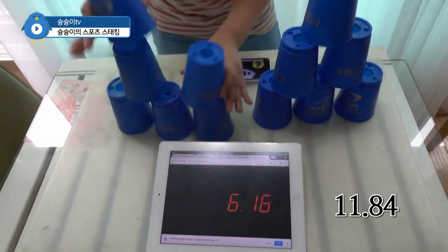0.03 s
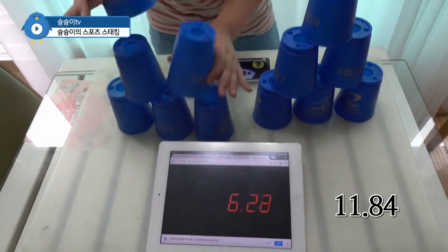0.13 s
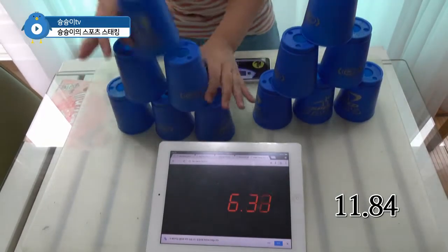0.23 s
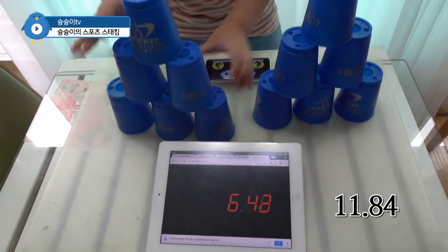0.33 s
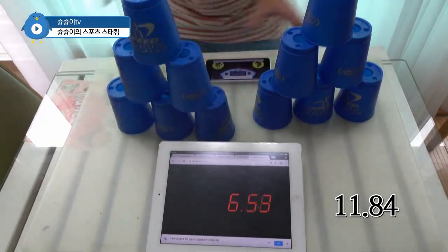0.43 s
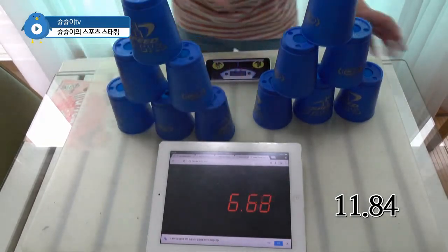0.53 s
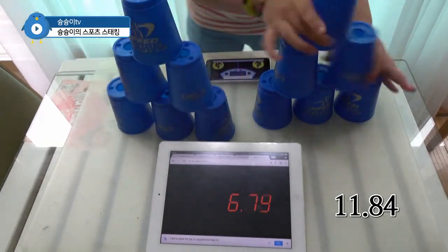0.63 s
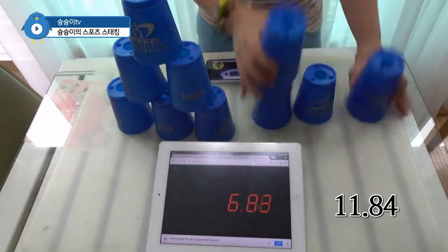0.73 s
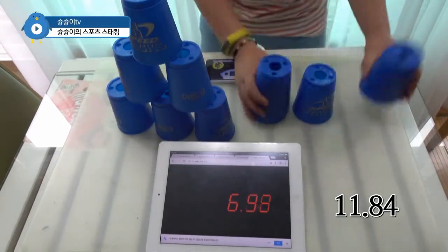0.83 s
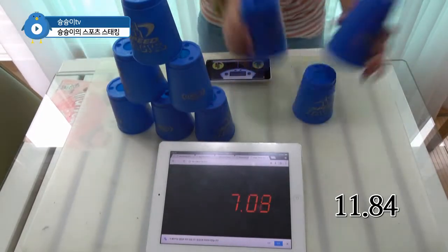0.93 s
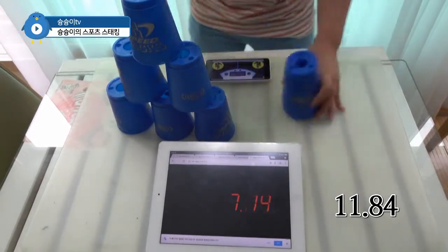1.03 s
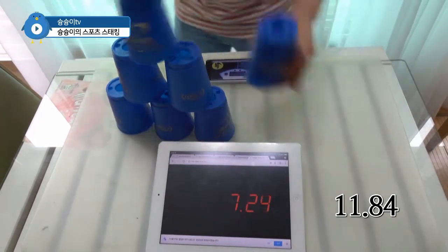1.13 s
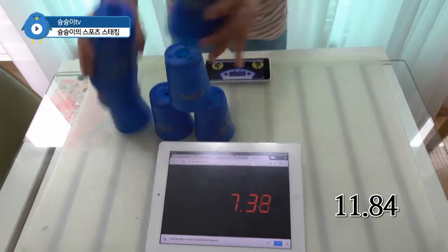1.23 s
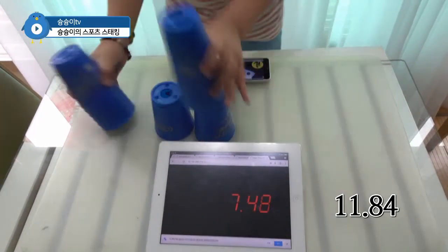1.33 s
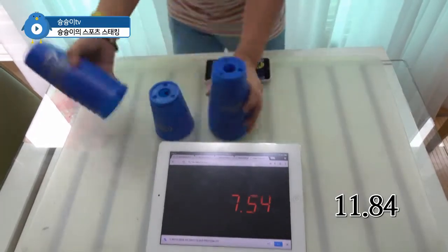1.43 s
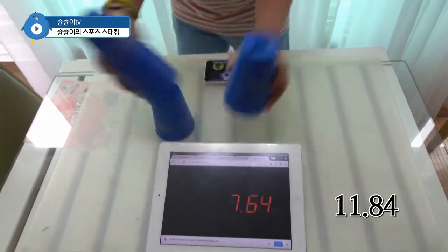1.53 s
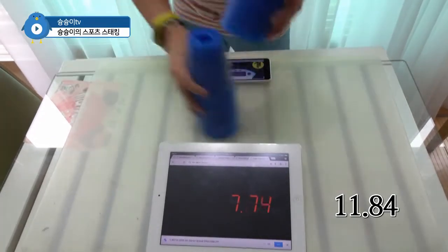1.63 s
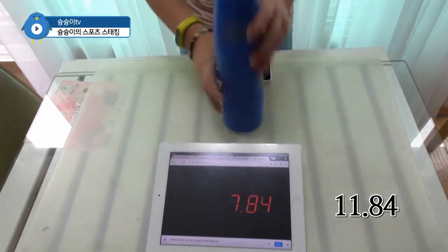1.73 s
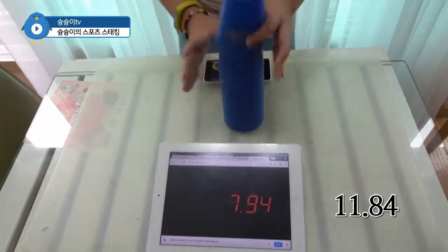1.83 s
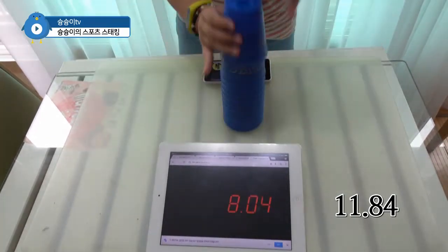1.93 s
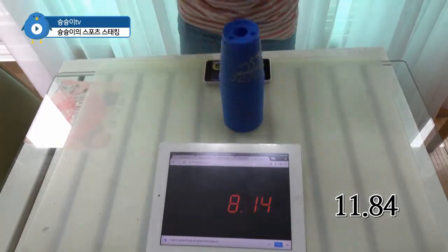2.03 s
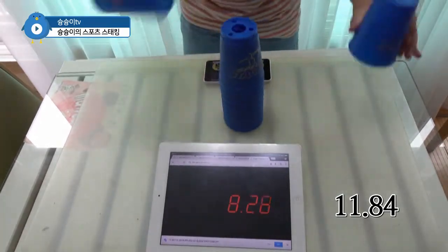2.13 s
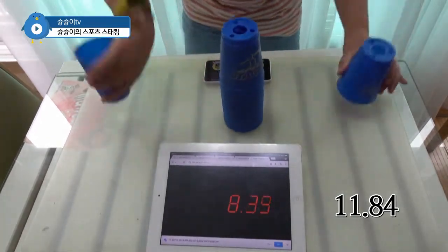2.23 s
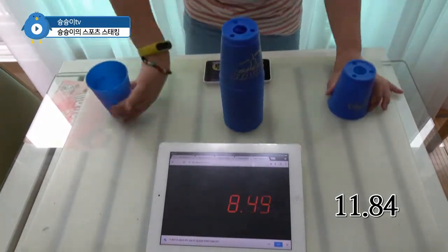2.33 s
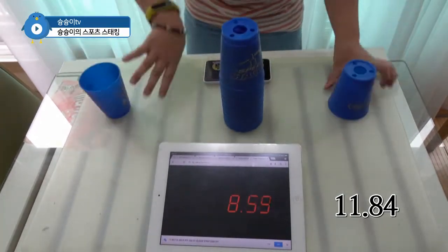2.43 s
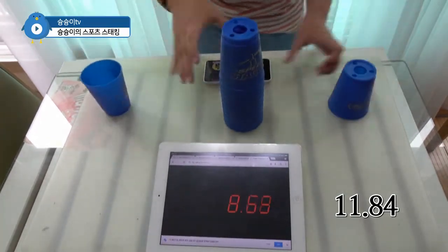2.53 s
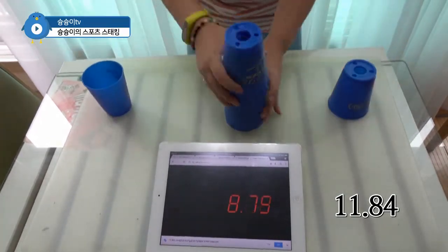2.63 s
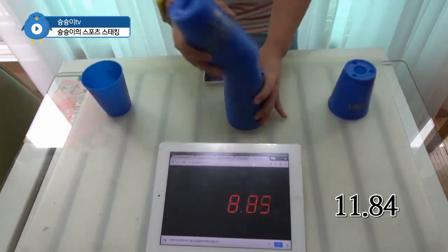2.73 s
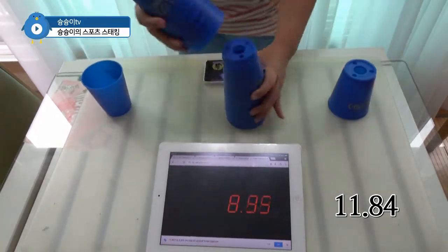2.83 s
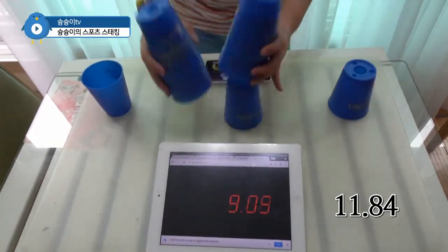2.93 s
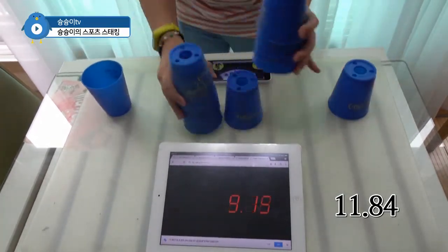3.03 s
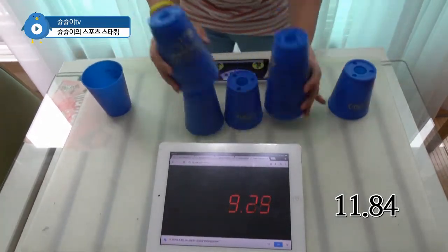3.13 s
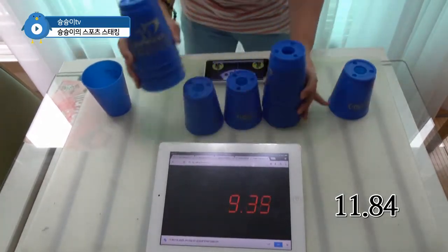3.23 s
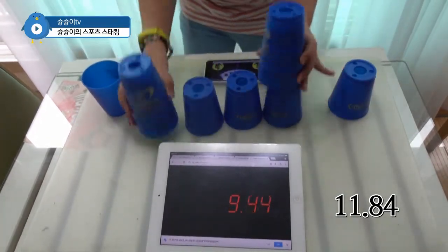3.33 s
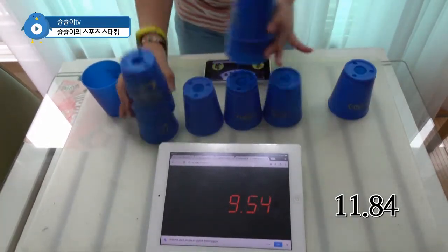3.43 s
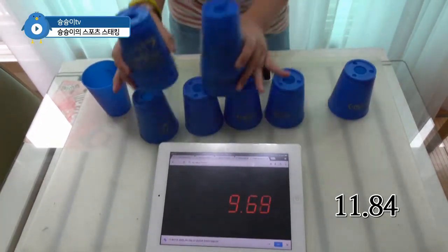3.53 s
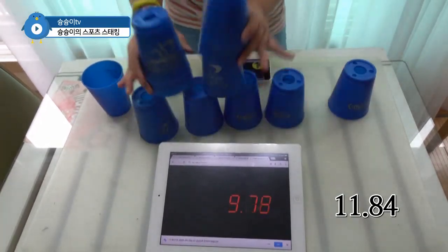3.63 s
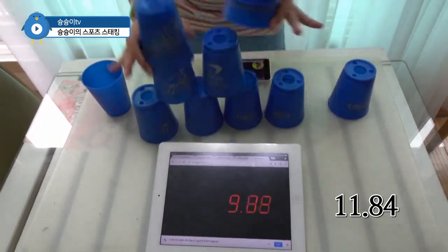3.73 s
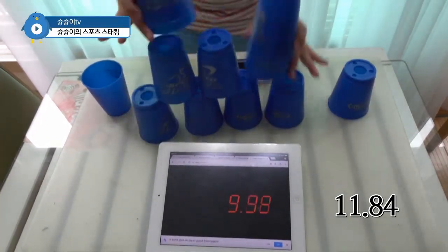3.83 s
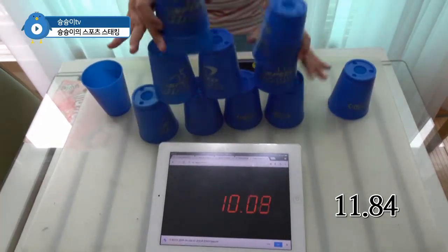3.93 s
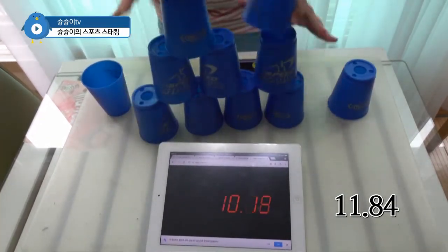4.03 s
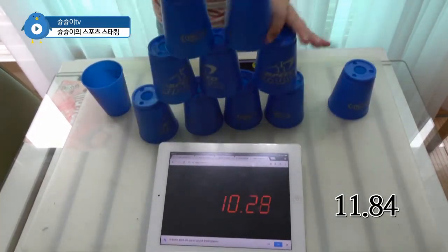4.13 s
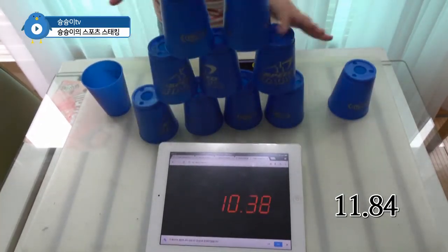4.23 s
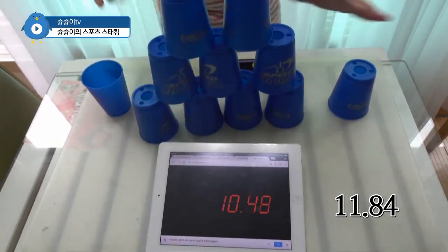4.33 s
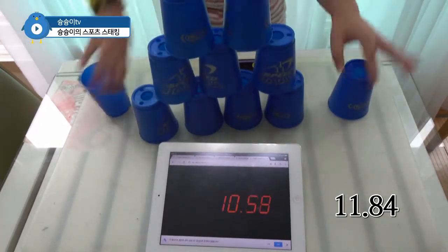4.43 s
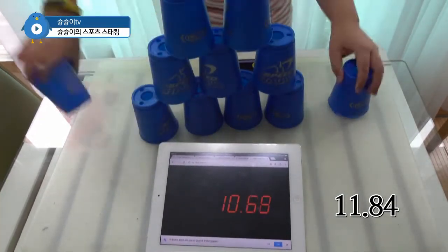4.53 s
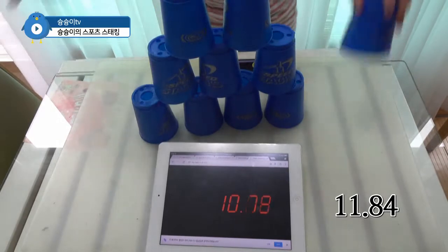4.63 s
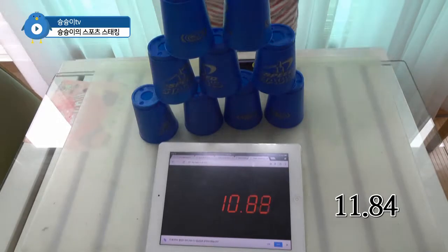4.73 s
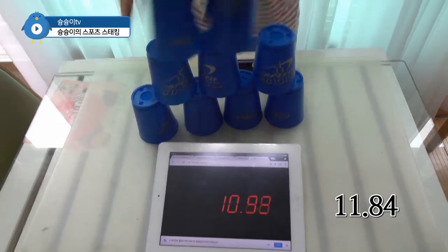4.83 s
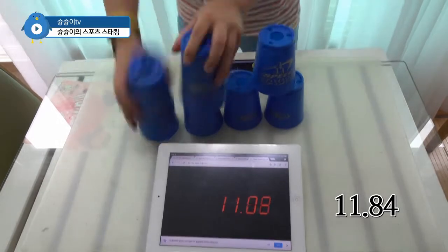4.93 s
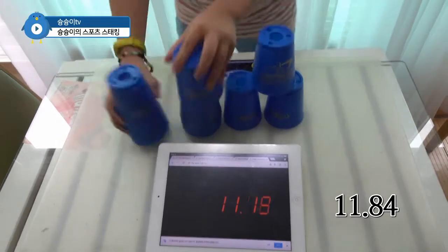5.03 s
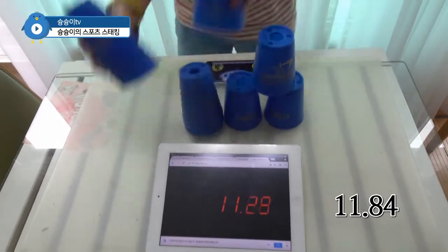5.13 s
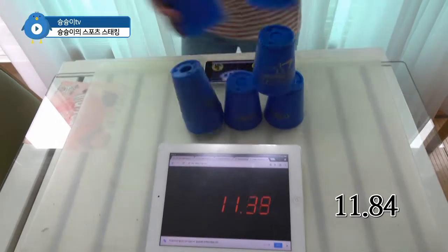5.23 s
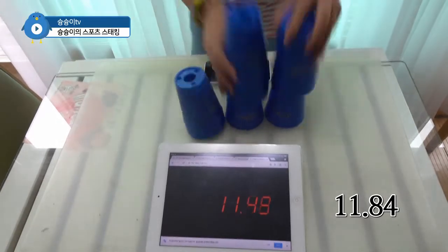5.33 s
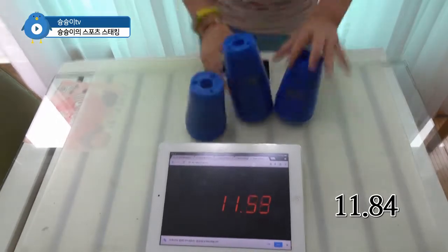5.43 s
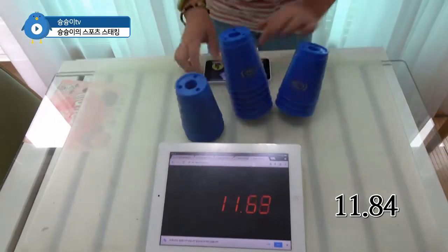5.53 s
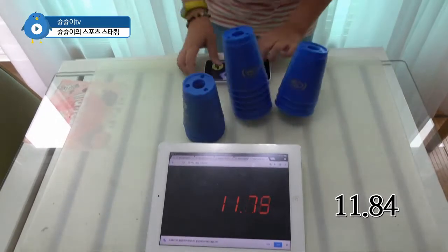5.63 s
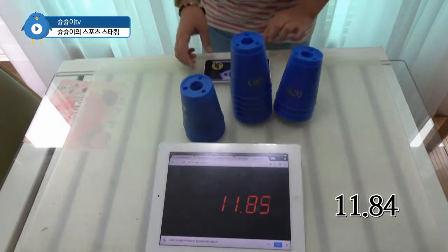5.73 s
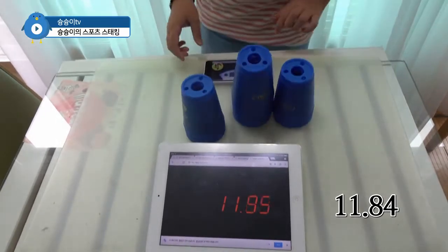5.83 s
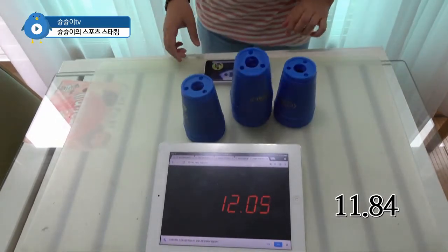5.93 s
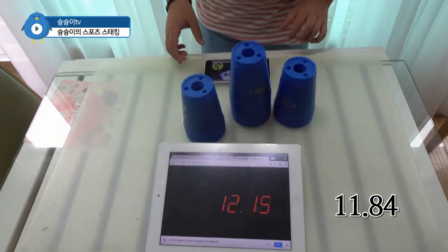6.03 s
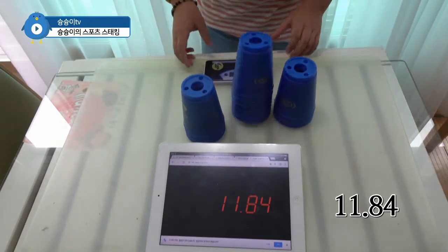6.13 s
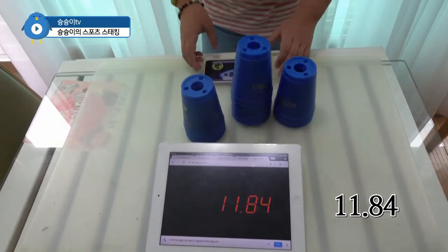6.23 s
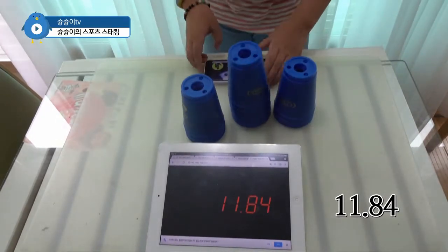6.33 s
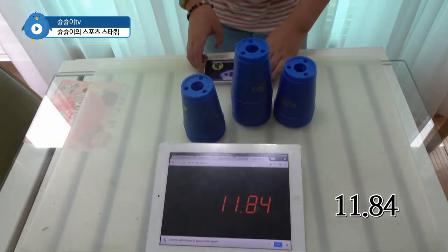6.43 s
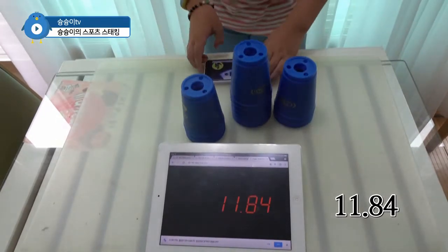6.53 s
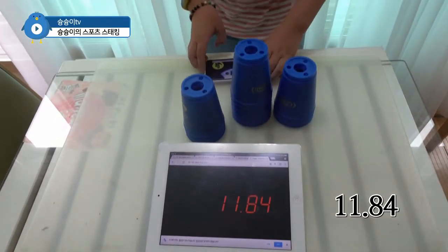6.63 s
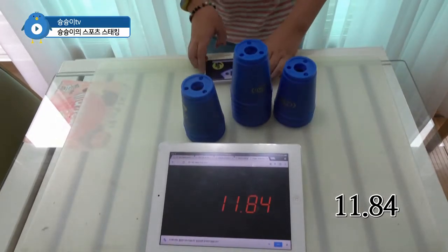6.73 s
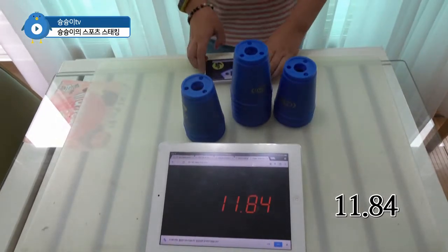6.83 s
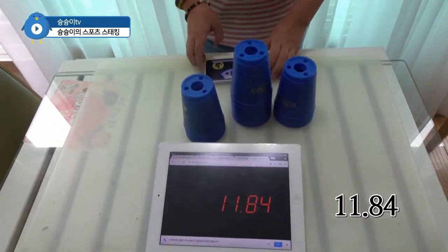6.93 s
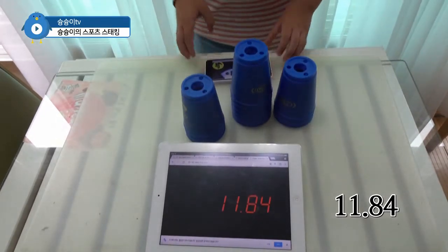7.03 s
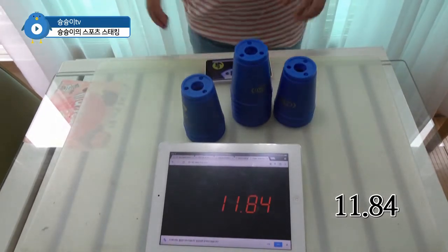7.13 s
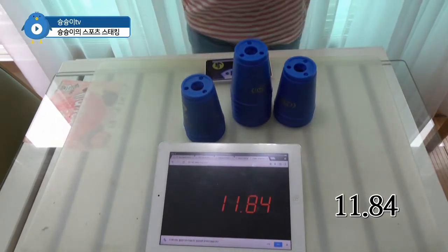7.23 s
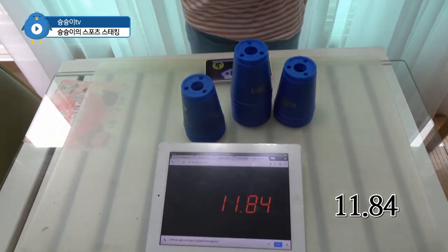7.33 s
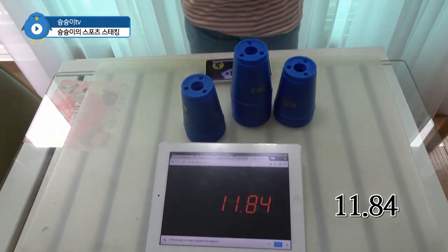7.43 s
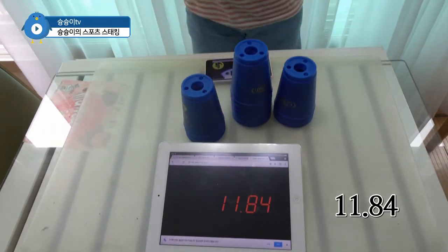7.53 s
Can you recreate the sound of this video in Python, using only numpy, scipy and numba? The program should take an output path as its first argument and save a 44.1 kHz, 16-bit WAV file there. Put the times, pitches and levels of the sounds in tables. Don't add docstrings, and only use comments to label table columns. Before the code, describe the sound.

Close stereo microphones in a small, lively room catch hollow plastic cups being stacked very fast on a table. A loud rattling collapse with sharp rim clashes comes first, then a quieter moment of sleeve rustle and finger taps, a quick run of separate cup knocks, a second hard collapse, and finally soft hand thumps fading into low house murmur.

```python
import sys
import numpy as np
from scipy import signal
from scipy.fft import rfft, irfft
from scipy.io import wavfile
from scipy.ndimage import uniform_filter1d, minimum_filter1d
from numba import njit

SR = 44100
rng = np.random.default_rng(int(sys.argv[2]) if len(sys.argv) > 2 else 0)


def invert_db(level):
    return 10 ** (np.asarray(level, dtype=float) / 20)


def unload_wav(signal):
    wavfile.write(
        sys.argv[1],
        SR,
        np.round(np.clip(np.atleast_2d(signal).T, -1, 1) * 32767).astype(np.int16),
    )


N = 335146

# (frequency [Hz], level [dB], t60 [s])
TABLE_MODES = [(144.5, -2.5, 0.17), (260.4, 3.5, 0.075), (364.3, 3.5, 0.1), (565, -11, 0.063),
               (110, -12, 0.041)]
# (frequency [Hz], level [dB])
RIM_SPECTRUM = [(800, -3.5), (2500, 0), (3500, -0.5), (5200, 1.5), (7500, -2.5), (11000, -6.5),
                (15000, -14.5)]


def colour(x, points):
    hz, db = np.transpose(points)
    f = np.maximum(np.fft.rfftfreq(x.shape[-1], 1 / SR), 1)
    gain = invert_db(np.interp(np.log(f), np.log(hz), db))
    return irfft(rfft(x) * gain, x.shape[-1])


def unit(x):
    return x / np.sqrt(np.mean(x ** 2))


def walk(rate):
    hold = int(SR / rate)
    steps = np.repeat(rng.standard_normal(N // hold + 1), hold)
    return unit(uniform_filter1d(steps, hold)[:N])


def half_octave(f):
    return [(f / 1.5, -60), (f / 1.3, -6), (f, 0), (f * 1.3, -6), (f * 1.5, -60)]


def ring(modes, pitch, chance):
    contact_s = 0.0011
    t = np.arange(SR // 4)[:, None] / SR
    hz, db, t60 = np.transpose(modes)
    hz = hz * pitch * (1 + chance[0])
    size = invert_db(db + chance[1]) * (-1) ** np.arange(len(hz))
    decay = np.exp(-np.log(1000) * t / t60)
    y = (size * np.sin(2 * np.pi * hz * t) * decay).sum(axis=1)
    y = y * np.minimum(t[:, 0] / contact_s, 1)
    return y / np.abs(y).max()


def add(out, s, y, pan_db, send=None):
    send = y if send is None else send
    i = max(int(s * SR), 0)
    y, send = y[:N - i], send[:N - i]
    sides = invert_db(np.array([[pan_db], [-pan_db]]) / 2)
    out[:2, i:i + len(y)] += y * sides
    out[2, i:i + len(y)] += send


def harder(db):
    knee_db, hidden_db_per_db = -13.5, 1.257
    return db + hidden_db_per_db * np.maximum(db - knee_db, 0)


def knock(out, s, db, hz, table_db, shell_db, wall_db):
    # (ratio to cup pitch, level [dB], t60 [s])
    air_modes = [(1.002, 8.5, 0.022), (0.73, -10, 0.062), (1.235, -5, 0.038), (0.619, 0, 0.019)]
    # (frequency [Hz], level [dB], t60 [s])
    shell_modes = [(1194, 0, 0.053), (1061, 10, 0.013), (1275, -3.5, 0.044), (1400, 2.5, 0.025)]
    # (frequency [Hz], level [dB], t60 [s])
    wall_modes = [(1578, -10, 0.041), (1900, 11.5, 0.0048), (2248, 11.5, 0.0038), (3130, -4, 0.0034)]
    c = rng.standard_normal((4, 2, 5))
    air = ring(air_modes, hz, c[0, :, :4] * [[.03], [3.0]] * [0, 1, 1, 1])
    shell = ring(shell_modes, 0.93, c[1, :, :4] * [[.02], [3.0]])
    wall = ring(wall_modes, 0.92, c[2, :, :4] * [[.06], [3.0]])
    table = ring(TABLE_MODES, 1, c[3] * [[.008], [2.5]])
    cup = air + invert_db(shell_db + 2.0) * shell - invert_db(wall_db + 15.5) * wall
    add(out, s, invert_db(db) * cup / np.abs(cup).max(), 0.5 * c[0, 0, 4])
    add(out, s, invert_db(db + table_db + 8.0) * table, 0)


def tick(out, s, db, top_db, straight_db=0):
    fizz, fizz_decay_s, room_click = 0.16, 0.004, 1.7
    lead = 24
    t = np.arange(1024) / SR
    noise = rng.standard_normal(1025)
    click = signal.unit_impulse(1024)
    direct = click + fizz * noise[1:] * np.exp(-t / fizz_decay_s)
    contact = np.roll([direct, click * room_click], lead, axis=1)
    sharpness = np.outer([0.043, 0.035, 0.006, 0.17, 0.3, 0.56, 0.7], [0, top_db])
    crack = colour(contact, RIM_SPECTRUM + sharpness)
    crack = invert_db(db) * crack / np.abs(crack[1] / room_click).max()
    add(out, s - lead / SR, invert_db(straight_db) * crack[0], 1.7 * noise[0], crack[1])


def stacked_cups(out):
    # (time [s], peak [dB], cup pitch [Hz], shell share [dB], rim tick [dB])
    stacked = [(0.212, -7.5, 820, -6, -11.5), (0.278, -5.5, 546, 2.5, -38), (0.66, -10.5, 556, -7.5, -26),
               (0.707, -11, 503, -4, -38), (1.767, -13, 805, -1, -25), (2.331, -5, 772, -10, -11),
               (3.082, -9.5, 553, -7.5, -20), (3.145, -14, 584, -18, -28.5), (3.22, -9.5, 507, -15, -23.5),
               (3.406, -3.5, 658, -4.5, -7), (3.574, -6.5, 582, -4.5, -15), (3.683, -13.5, 524, -5, -29.5),
               (3.717, -8, 723, -6.5, -14), (3.821, -6.5, 872, -8.5, -14), (3.904, -4.5, 695, -9, -8),
               (3.956, -9, 620, -6, -26), (3.987, -7, 549, 0, -12.5), (4.162, -6, 646, -9, -13),
               (4.242, -6, 502, -1, -38), (4.335, -15, 462, 6, -34), (4.353, -12.5, 552, -0.5, -25.5),
               (4.528, -22, 466, -11, -44.5), (4.801, -4.5, 496, -1.5, -4.5), (5.3267, -9, 945, -6, -14)]
    table_db, wall_db, wall_db_per_db = -23.5, -9.5, 2.1
    bright_db, straight_db = -21, -3.5
    for s, db, hz, shell_db, tick_db in stacked:
        knock(out, s, harder(db), hz, table_db, shell_db, wall_db + wall_db_per_db * db)
        tick(out, s, tick_db + 11.0, bright_db, straight_db)


def swept_cups(out):
    # (time [s], peak [dB], cup pitch [Hz], shell share [dB], upper wall share [dB])
    swept = [(0.033, -11, 997, -24, -55), (0.767, -7.5, 874, -30, -37), (0.816, -4.5, 675, -36, -15),
             (1.001, -6, 690, -36, -12), (1.031, -5.5, 780, -11, -15.5), (1.164, -9.5, 694, -4, -17),
             (1.186, -10, 800, -7, -37), (1.223, -2, 826, -5.5, -20), (1.269, -5.5, 837, -16, -36),
             (1.295, -5, 930, -8, -40), (1.341, -7, 672, 5, -9), (1.58, -17, 585, -5, -31),
             (1.614, -18.5, 604, 2, -21), (1.648, -14, 750, -7.5, -44), (1.69, -13.5, 694, -39, -39),
             (1.703, -11.5, 570, -12.5, -23), (1.752, -13, 447, -35, -30), (1.819, -8.5, 735, -22, -13.5),
             (1.908, -18.5, 806, -8, -20), (4.929, -5, 700, -30, -11), (5.101, -10, 780, -2, -15.5),
             (5.381, -8.5, 947, 16, -22), (5.412, -3.5, 620, -10.5, -19), (6.004, -21.5, 650, -33, -11)]
    for s, db, hz, shell_db, wall_db in swept:
        knock(out, s, harder(db), hz, -20, shell_db, wall_db)


def slides(out):
    # (time [s], rattle [dB], cup pitch [Hz], rim share [dB])
    sweeps = [
        [(0.0, -17, 897, -14), (0.038, -28.5, 866, -3), (0.1, -39, 870, -51)],
        [(0.712, -23, 860, -10.5), (0.766, -16.5, 703, -14.5), (0.82, -17.5, 786, -5.5), (0.848, -19, 940, -17),
         (0.95, -56.5, 910, -33)],
        [(1.0, -38.5, 920, -17), (1.066, -12.5, 780, -9.5), (1.14, -31, 864, -22)],
        [(1.23, -20.5, 860, -27.5), (1.248, -14.5, 800, -23), (1.36, -23, 1010, -12), (1.488, -20, 676, -31.5),
         (1.53, -27, 820, -8.5)],
        [(4.8, -10, 1025, -15.5), (4.906, -16.5, 945, -4.5), (4.97, -11.5, 850, -13), (5.034, -28.5, 680, -13),
         (5.09, -25.5, 690, -13)],
        [(5.33, -35, 1130, -4), (5.358, -14, 1000, -20), (5.405, -16.5, 950, -11), (5.478, -30, 726, -19),
         (5.55, -29.5, 840, -30)],
    ]
    table_share_db, wall_share_db = (-22, -6.5), (-16, -2)
    chatter_hz, flicker_db = 100, 6
    scrape = np.zeros(N)
    for rows in sweeps:
        s, *columns = np.transpose(rows)
        when = np.arange(s[0], s[-1], 1 / chatter_hz)
        for t, c in zip(when, rng.standard_normal((len(when), 5))):
            db, hz, rim_db = (np.interp(t, s, v) for v in columns)
            table_db = np.interp(t, s[[0, -1]], table_share_db) - 4.5
            wall_db = np.interp(t, s[[0, -1]], wall_share_db) - 10.5
            db = harder(db + 7.5) - 5.0
            hz = min(hz, 1100) * (1 + 0.085 * np.tanh(c[2]))
            t = t + .004 * abs(c[0])
            knock(out, t, db + 3.8 * c[1], hz, table_db, -9.0 + 1.0 * c[3], wall_db)
            tick(out, t, db + rim_db + 9.0 + 1.2 * c[4], 2.1 * c[3] - 7.0)
        now = np.arange(int(s[0] * SR), int(s[-1] * SR))
        scrape_db = harder(columns[0] + 2.0) + columns[2]
        scrape[now] = invert_db(np.interp(now / SR, s, scrape_db) - 11.0)
    flicker = invert_db(flicker_db * walk(120) + 5.5)
    return scrape * flicker * unit(colour(rng.standard_normal((2, N)), RIM_SPECTRUM))


def rim_clashes(out):
    # (time [s], peak [dB], brightness [dB])
    clashes = [(0.722, -9.5, 0.5), (0.7523, -5.5, 16.5), (0.7653, 1, -9.5), (1.0017, 8.5, -20),
               (1.0394, -2, -17), (1.162, -23, -14.5), (1.1868, -8, 3), (1.2225, 12.5, -10),
               (1.2521, 11.5, -3), (1.268, 4.5, 9.5), (1.357, -13, 4), (1.4228, -10, 1), (1.578, -25.5, -9),
               (1.613, -12, 14), (1.645, -20, -11), (1.6883, -19, 0), (1.702, -16, 0), (1.753, -24, 23),
               (1.8182, -11.5, 19), (1.865, -23.5, -11), (1.911, -28.5, 15), (4.8248, -2.5, -19),
               (4.8878, -14, -10), (5.1032, -18.5, -20), (5.337, -28, -19.5), (5.3771, 4, -20),
               (5.4025, -5, -7)]
    # (time [s], peak [dB], brightness [dB])
    touches = [(0.0796, -29, -8), (0.47, -37.5, -7), (2.1774, -56, -12), (2.1972, -48, 4),
               (2.2094, -33, 22), (2.468, -50, -25), (2.557, -50, -30), (2.572, -29, -9), (2.9686, -43, -7),
               (3.012, -38, -29), (3.132, -28, -33), (3.3186, -42, -14), (3.343, -25.5, 16),
               (3.521, -32, -7), (4.266, -50, -30), (4.434, -39, 26), (4.577, -41.5, -20),
               (4.621, -41.5, -21), (5.599, -40, 1), (5.669, -53.5, 1), (6.002, -35.5, -59),
               (6.0616, -46, -57), (6.158, -43, -53), (7.4643, -56, -54)]
    # (time [s], peak [dB], brightness [dB])
    chatter = [(0.277, 4, -22), (0.7085, -3, -13.5), (0.7536, -1, -15), (0.794, -11, -22), (0.837, 0, -22),
               (1.0526, -6, -12), (1.159, -9, -6), (1.1646, -3.5, -9), (1.196, -15.5, -9), (1.287, 9, -9),
               (1.324, -15, -25), (1.3867, -11.5, -10), (1.45, -8, -16), (1.5284, -20, -36),
               (1.692, -28, -8.5), (1.818, -4, -17), (4.243, -1, -22), (4.266, -15.5, -11),
               (4.354, -18, -14), (4.8387, 2.5, -11), (4.852, 1, -6), (4.861, 0, -11), (4.896, 5, -15),
               (4.907, -6, -7), (4.923, 4, -7), (4.932, 2, -4), (4.942, 1.5, -35), (4.978, 1.5, -11.5),
               (5.0, -3, -32), (5.1295, -21, -20), (5.3219, -18.5, 3), (5.366, 1, -3), (5.4119, 6, -4),
               (5.435, -9, -19), (5.612, -39, -19)]
    facing_db = 3.5
    for s, db, top_db in clashes + touches:
        tick(out, s, db + 5.5, top_db, facing_db)
    for s, db, top_db in chatter:
        tick(out, s, db - 2.0, top_db, facing_db)


def thumps(out):
    # (time [s], peak [dB], cup pitch [Hz], table share [dB], rim tick [dB])
    thump_events = [(0.643, -31, 565, -15, -56), (1.45, -7.5, 560, -11.5, -14.5),
                    (0.845, -22.5, 850, -0.5, -49), (2.638, -42, 412, 4.5, -42),
                    (2.708, -33.5, 840, -9, -48), (2.727, -34, 780, -32, -55), (2.758, -33, 750, -37, -57),
                    (2.797, -24.5, 910, -42, -45), (2.808, -36, 430, 7.5, -44), (2.891, -29, 900, -11, -52),
                    (2.922, -46, 476, 7.5, -52), (2.985, -35, 450, -24, -42),
                    (4.478, -22.5, 825, -3.5, -50), (5.001, -11, 410, 0, -9), (5.611, -25, 676, -14, -41),
                    (5.73, -38, 710, -14, -50.5), (5.794, -38.5, 423, -1, -62),
                    (5.842, -11.5, 480, -12.5, -30.5), (5.985, -16.5, 540, -11.5, -35.5),
                    (6.103, -34.5, 530, 2, -52), (6.31, -24.5, 391, 1, -38.5),
                    (6.458, -29, 444, 2.5, -49.5), (6.555, -33, 532, 2.5, -54),
                    (6.634, -48.5, 920, 9.5, -57)]
    shell_db, wall_db, bright_db = -17, -35.5, -54
    for s, db, hz, table_db, tick_db in thump_events:
        knock(out, s, harder(db), hz, table_db, shell_db, wall_db)
        tick(out, s, tick_db + 11.5, bright_db)


def landings(out):
    # (time [s], peak [dB], table pitch ratio)
    landing_events = [(0.808, -19, .99), (0.848, -17, 0.95), (1.047, -9.5, 1), (1.819, -15, 0.66),
                      (1.455, -15, 0.92), (2.806, -28.5, 0.93), (3.082, -16.5, 1), (3.221, -26, .99),
                      (4.161, -14, 1), (4.243, -15, 0.93), (3.407, -21, .99), (0.28, -16, 0.96),
                      (4.941, -14.5, 0.92), (5.003, -10.5, 1), (5.161, -26.5, 0.92), (5.412, -10, 0.93),
                      (5.654, -27, 0.92), (6.311, -23, 0.94), (6.459, -32, .99), (6.556, -34, 0.94)]
    for s, db, pitch in landing_events:
        add(out, s, invert_db(harder(db)) * ring(TABLE_MODES, pitch, np.zeros(2)), 0)


def rings(out):
    # (time [s], peak [dB], pitch [Hz])
    ring_events = [(0.839, -10.5, 1624), (1.05, -9.5, 370), (1.769, -12, 380), (2.334, -10, 970),
                   (3.408, -11, 1380), (3.721, -11.5, 1604), (4.0, -16, 1540), (4.357, -15.5, 1172),
                   (4.253, -14.5, 1188), (5.845, -31, 1634), (6.311, -34, 1025), (6.47, -39, 1190)]
    # (ratio to pitch, level [dB], t60 [s])
    note_modes = [(1, -0.5, 0.022), (1.03, -8.5, 0.047)]
    for s, db, hz in ring_events:
        chance = rng.standard_normal((2, 2)) * 0.0044
        add(out, s, invert_db(harder(db)) * ring(note_modes, hz, chance), 0)


def cup_notes(out):
    # (time [s], peak [dB], pitch [Hz], t60 [s])
    notes = [(0.661, -19.5, 515, 0.025), (0.235, -12, 640, 0.041), (0.285, -12.5, 560, 0.045),
             (0.072, -19, 785, 0.027), (5.02, -13.5, 604, 0.031), (5.455, -13.5, 650, 0.02),
             (4.93, -10.5, 620, 0.03), (0.79, -12.5, 1720, .04), (1.082, -13.5, 1900, 0.05),
             (1.052, -11.5, 1850, 0.03), (1.167, -13, 2100, 0.015), (1.1, -15, 2100, 0.012),
             (1.196, -14.5, 1170, 0.035), (1.27, -12, 836, 0.055), (1.294, -8.5, 1000, 0.063),
             (1.34, -10.5, 1178, 0.097), (2.344, -12, 1090, 0.054), (2.365, -13, 900, 0.049),
             (2.729, -24.5, 760, 0.021), (2.759, -35, 790, 0.027), (2.798, -23, 1400, 0.0067),
             (1.819, -21, 1600, 0.0099), (1.82, -13.5, 2390, 0.012), (1.775, -18.5, 1124, 0.035),
             (3.41, -13.5, 644, 0.18), (3.99, -11.5, 1149, 0.063), (3.72, -13.5, 720, 0.077),
             (2.893, -25, 840, 0.019), (3.083, -25, 1180, .06), (3.22, -15, 1292, 0.037),
             (3.224, -20.5, 362, 0.13), (4.165, -11, 1140, 0.15), (4.799, -8, 1187, 0.11),
             (4.863, -12, 1500, 0.066), (4.943, -10.5, 1760, 0.027), (5.101, -15, 1786, 0.039),
             (5.328, -15.5, 1230, 0.06), (5.413, -13, 1600, 0.061), (5.844, -23, 420, 0.06),
             (5.844, -27, 1653, 0.031), (5.987, -26, 1620, 0.025), (6.004, -32, 1700, 0.03),
             (5.4, -45, 1210, 0.06), (6.312, -32.5, 1120, 0.025), (6.312, -33, 750, 0.03),
             (7.2, -32, 970, 0.026), (6.557, -36, 1240, 0.017),
             (0.213, -17, 2090, 0.025), (0.279, -15, 2080, 0.025), (1.11, -17, 1706, 0.035),
                (3.823, -13, 1130, 0.068), (4.0, -17.5, 1592, 0.12), (4.163, -17, 2120, 0.03),
                (4.244, -15, 2120, 0.031), (4.246, -10.5, 1158, 0.14), (4.355, -13, 1171, 0.1),
                (5.002, -10, 367, 0.13), (5.988, -27, 1830, 0.016), (1.455, -11, 300, 0.08),
                (1.052, -12, 265, 0.08), (1.77, -13, 330, 0.07), (2.333, -11, 660, 0.07),
                (3.083, -21, 2000, 0.015), (3.221, -21, 2000, 0.015), (3.7, -19, 1180, 0.04),
                (0.3, -16, 420, 0.06), (5.615, -27, 680, 0.12)]
    wet_db_per_db = 0.3
    for s, db, hz, t60 in notes:
        pair = [(1, 6, t60), (1.06, -9, t60)]
        note = invert_db(harder(db)) * ring(pair, hz, np.zeros(2))
        add(out, s, note, 0, note * invert_db(wet_db_per_db * min(db + 17.5, 0)))


def spread(mid, side, hz):
    share = max(min(hz / 4500, 1) ** 0.92, 10 / hz)
    return (mid + share * side * np.array([[1], [-1]])) / np.sqrt(1 + share ** 2)


def room():
    # (frequency [Hz], level [dB], t60 [s])
    room_bands = [(100, -11.5, 0.25), (214, -5, 0.33), (614, 3, 0.43), (1156, -2.5, 0.51), (2310, 1, 0.42),
                  (5050, -1.5, 0.43), (10340, 2.5, 0.31), (14500, 0.5, 0.17)]
    early_db, early_t60_s, early_db_per_octave = 12, 0.049, -1.5
    t = np.arange(SR) / SR
    hz, db, t60 = np.transpose(room_bands)
    onset = np.clip((t - .003) / 0.00062, 0, 1)
    tail = 0
    for f in 70 * 2 ** np.arange(0, 8, .5):
        mid, side = unit(colour(rng.standard_normal((2, SR)), half_octave(f)))
        late_t60 = np.interp(np.log(f), np.log(hz), t60)
        late = np.exp(-np.log(1000) * t / late_t60)
        first_db = early_db + early_db_per_octave * max(np.log2(f / 1500), 0)
        early = invert_db(first_db) * np.exp(-np.log(1000) * t / early_t60_s)
        shape = (late + early) * onset
        gain = invert_db(np.interp(np.log(f), np.log(hz), db)) * np.sqrt(f / SR / np.sum(shape ** 2))
        tail = tail + gain * shape * spread(mid, side, f)
    return tail


def rustle():
    # (time [s], length [s], level [dB])
    swells = [(0.158, 0.037, -51), (0.492, 0.22, -55), (0.698, 0.13, -38), (1.614, 0.091, -32),
              (1.75, 0.31, -37.5), (1.86, 0.25, -37.5), (2.025, 1, -58), (2.193, .06, -65.5),
              (2.652, 0.056, -45.5), (2.766, 0.15, -39), (2.914, 0.084, -43.5), (3.023, 0.18, -44.5),
              (3.183, 0.16, -53), (3.407, 0.32, -43.5), (4.54, 0.29, -50.5), (4.73, 0.14, -56),
              (5.622, 0.2, -51), (7, 0.17, -55), (7.3, 0.99, -60), (7.527, 0.26, -54.5), (7.48, 0.07, -48),
              (2.744, 0.046, -46)]
    t, gain = np.arange(N) / SR, 0
    for s, length, db in swells:
        gain = gain + invert_db(db) * np.exp(-(2.68 * (t - s) / length) ** 2)
    cloth = [(600, -3.0), (2000, 4.0), (4000, 1.5), (8000, -2.5), (15000, -10.0)]  # (Hz, dB)
    return gain * invert_db(2.0 * walk(77)) * unit(colour(rng.standard_normal((2, N)), cloth))


def hum():
    # (frequency [Hz], spectral density [dB per Hz])
    murmur = [(15, -34), (25, -4.5), (158, -0.5), (243, -2), (318, -0.5), (529, -6.5), (952, -7),
              (3180, -21.5), (7090, -44), (10300, -62), (12100, -77), (13800, -55), (15000, -71)]
    level_db = -44.5
    out, swell = 0, walk(1.0)
    hz, db = np.transpose(murmur)
    for f in 30 * 2 ** np.arange(0, 9, .5):
        mid, side = colour(rng.standard_normal((2, N)), half_octave(f))
        band_db = np.interp(np.log(f), np.log(hz), db) + 0.32 * swell + 1.5 * walk(8)
        out = out + invert_db(band_db) * spread(mid, side, f)
    return unit(out) * invert_db(level_db)


def scene():
    # (frequency [Hz], level [dB])
    direct_path = [(400, -0.5), (1000, 1), (3000, 2.5), (15000, 2)]
    moves_per_s = 0.9
    cups = np.zeros((3, N))
    for source in (stacked_cups, swept_cups, rim_clashes, thumps, landings, rings, cup_notes):
        source(cups)
    hiss = slides(cups)
    cups = cups + np.vstack([hiss, hiss.mean(axis=0)])
    cups = signal.sosfilt(signal.butter(3, 80, "high", fs=SR, output="sos"), cups)
    tails = room(), room()
    turn = 2 * np.pi * moves_per_s * np.arange(N) / SR
    paths = cups[2] * np.array([np.cos(turn), np.sin(turn)])
    wet = sum(signal.fftconvolve(x[None], tail, axes=1)[:, :N] for x, tail in zip(paths, tails))
    return colour(cups[:2], direct_path) + wet + rustle() + hum()


@njit
def follow(x, release):
    y, e = np.empty(len(x)), 1e-9
    for i in range(len(x)):
        e = x[i] if x[i] > e else e + (x[i] - e) * release
        y[i] = e
    return y


def roll_off(x):
    return signal.sosfilt(signal.butter(12, 16300, fs=SR, output="sos"), x)


def record(dry):
    ceiling_db, ratio, release_s, top_hz = -7.5, 6.0, 0.0085, 15300
    look = 89
    peak = follow(np.abs(dry).max(axis=0), 1 / (release_s * SR))
    gain = np.minimum(invert_db(ceiling_db) / peak, 1) ** (1 - 1 / ratio)
    gain = uniform_filter1d(minimum_filter1d(gain, size=look), size=look)
    mix = signal.sosfilt(signal.ellip(8, .2, 40, top_hz, fs=SR, output="sos"), dry * gain)
    return roll_off(mix)


dry = scene()
out = record(dry)
unload_wav(out)
```